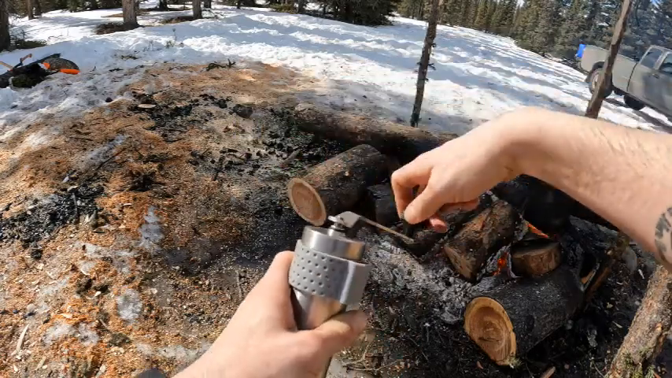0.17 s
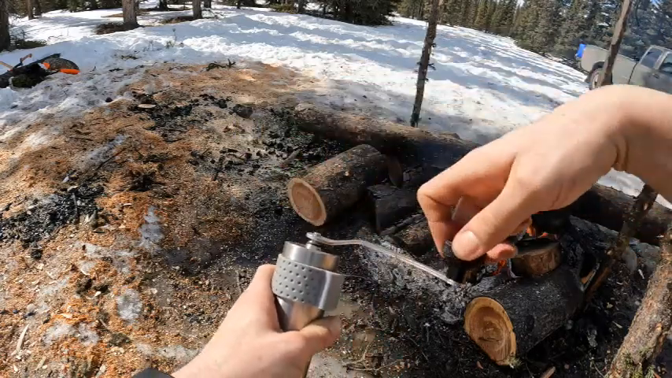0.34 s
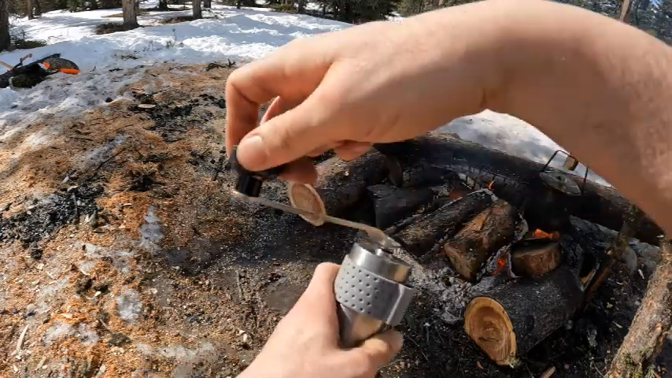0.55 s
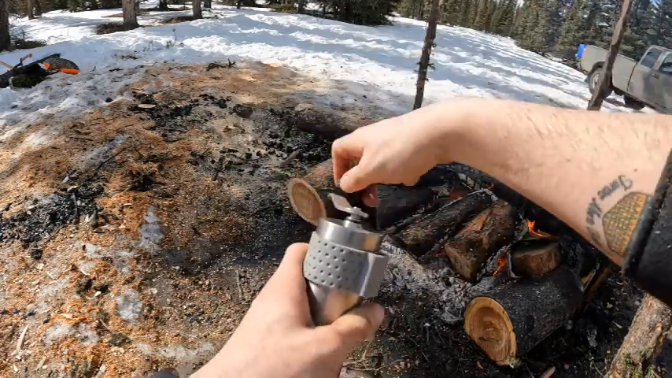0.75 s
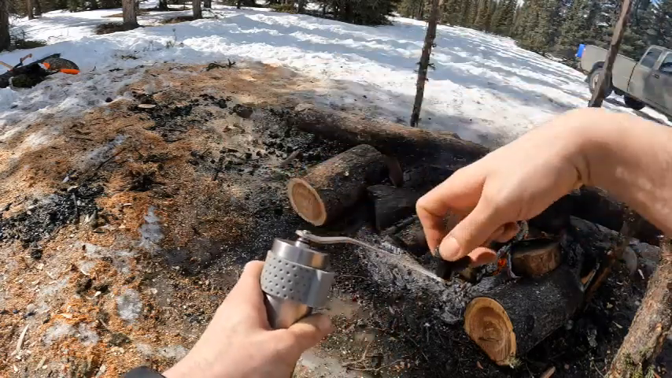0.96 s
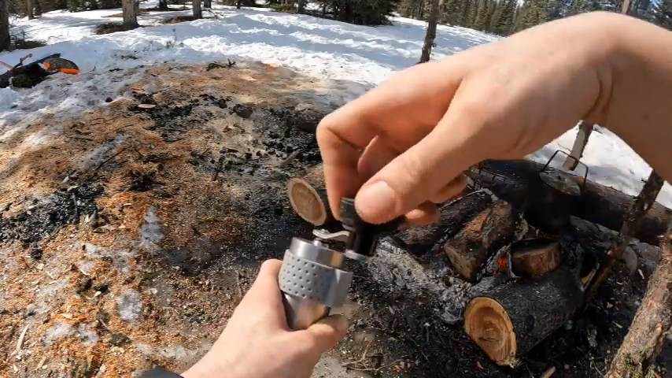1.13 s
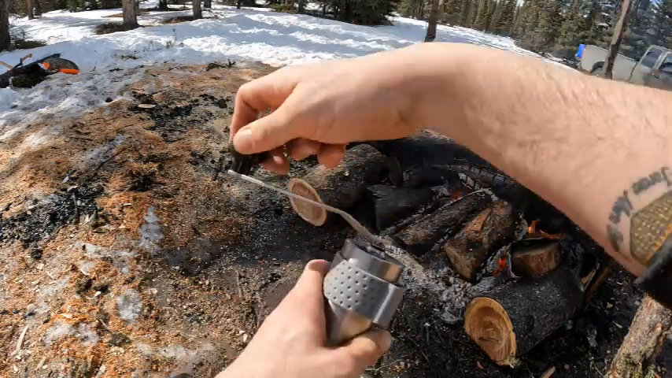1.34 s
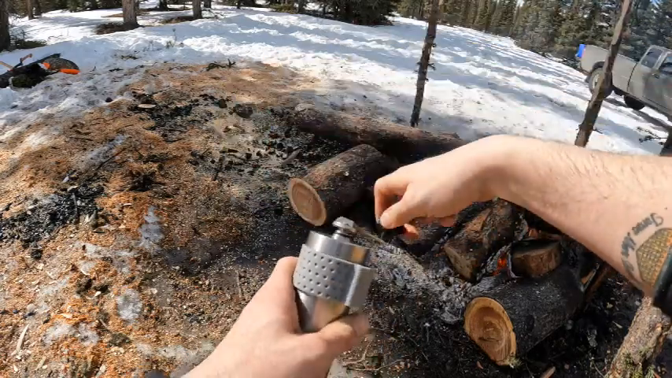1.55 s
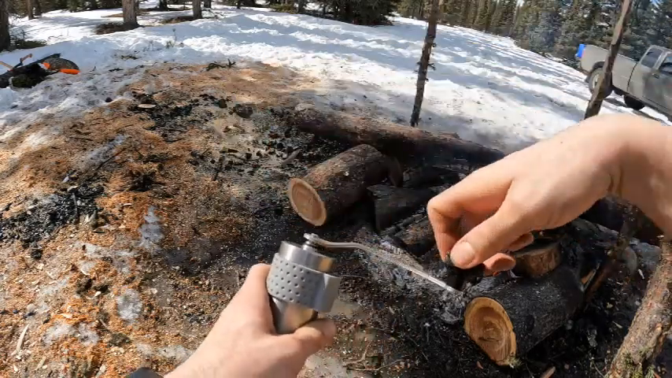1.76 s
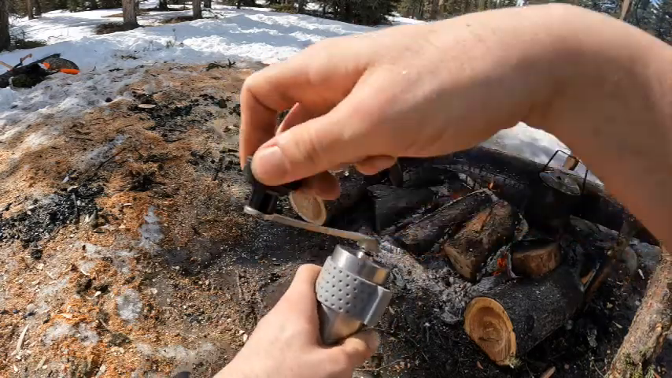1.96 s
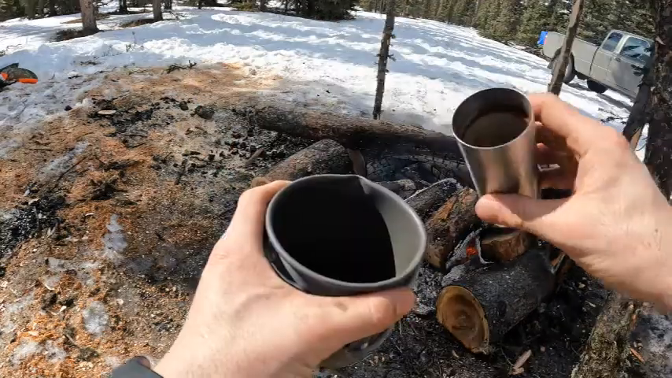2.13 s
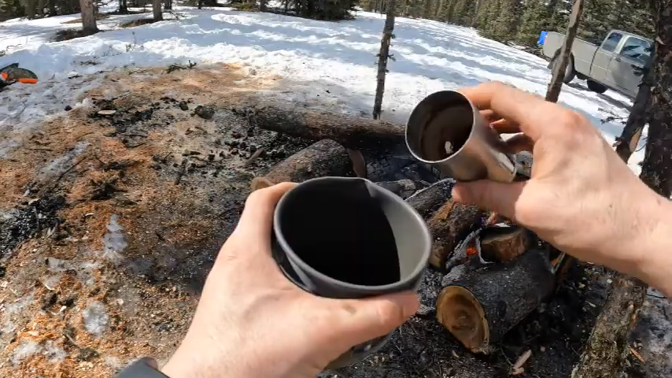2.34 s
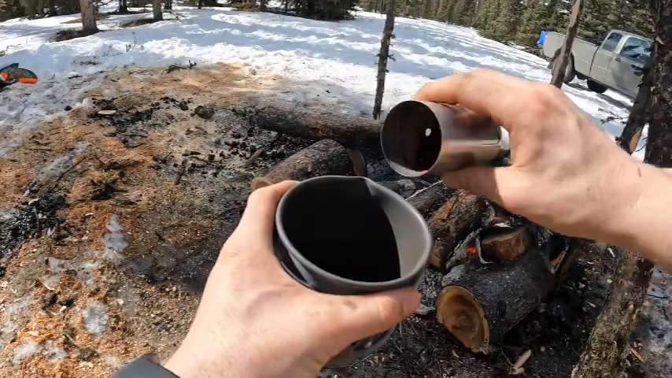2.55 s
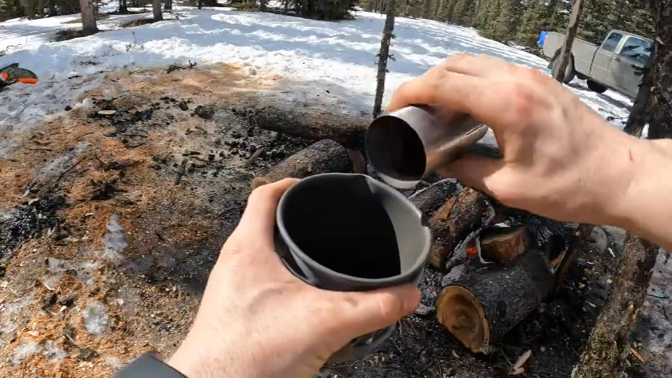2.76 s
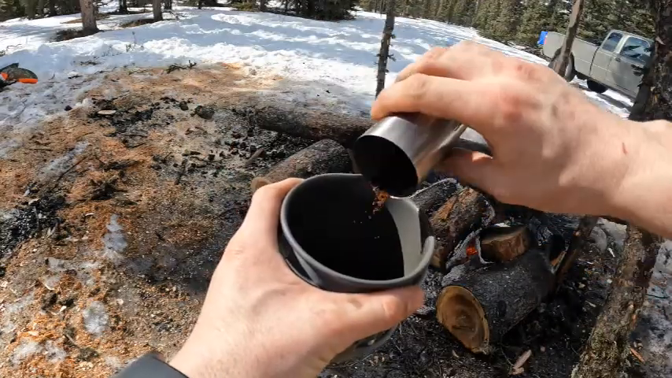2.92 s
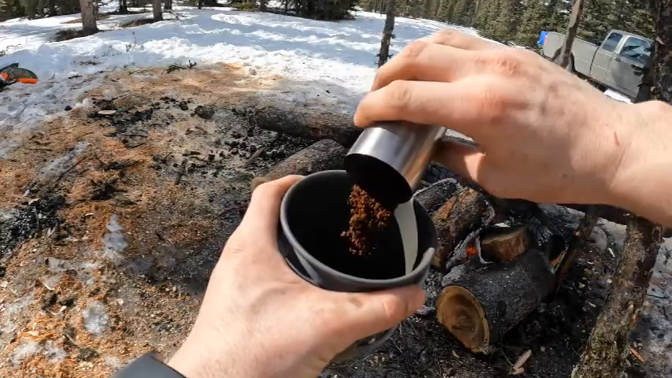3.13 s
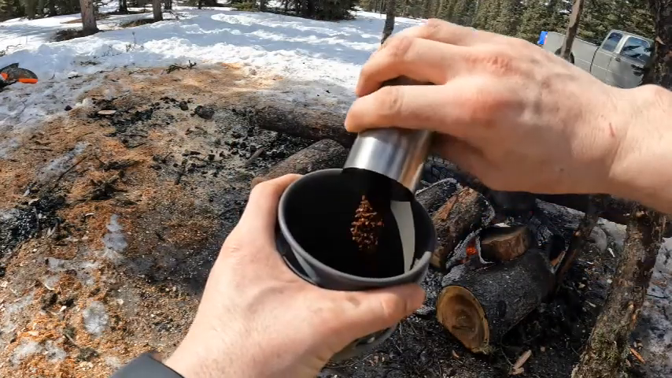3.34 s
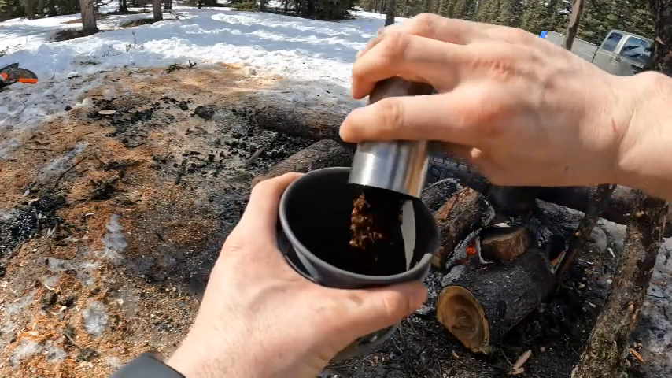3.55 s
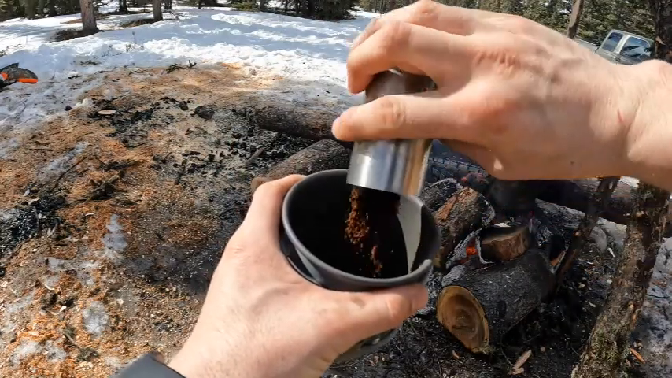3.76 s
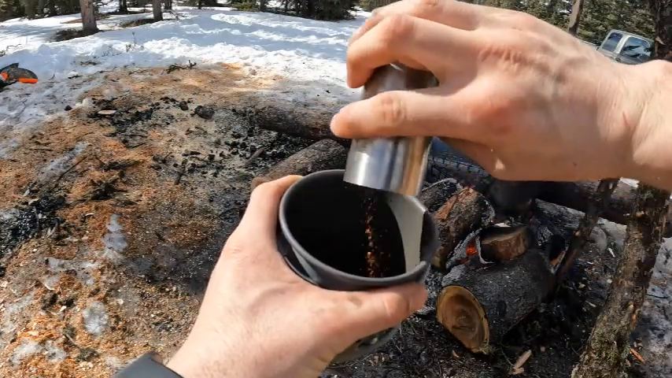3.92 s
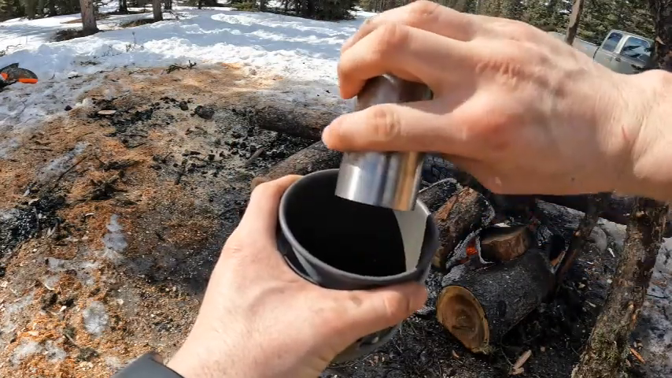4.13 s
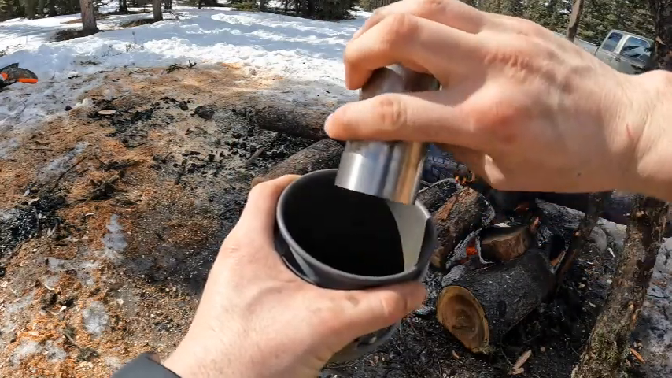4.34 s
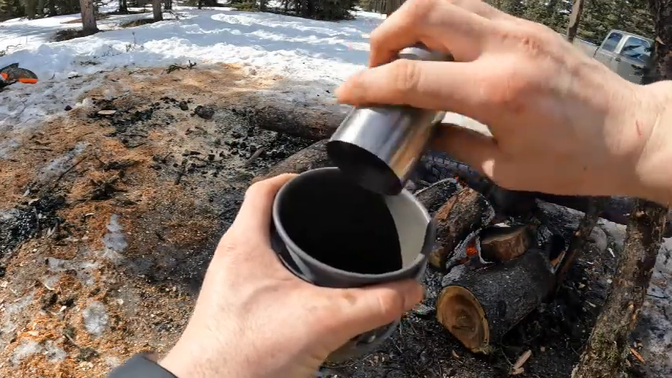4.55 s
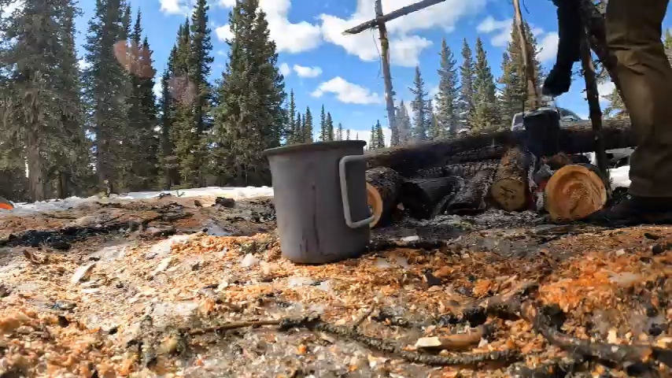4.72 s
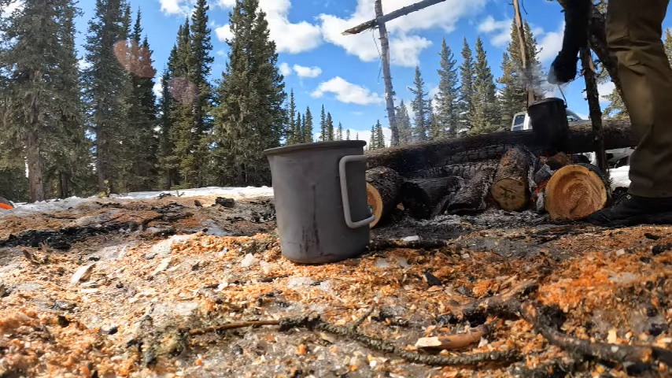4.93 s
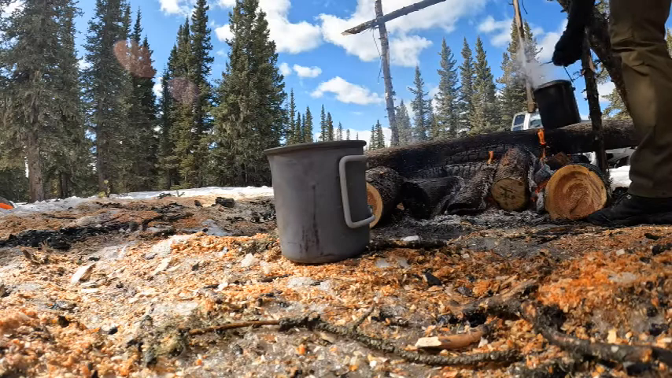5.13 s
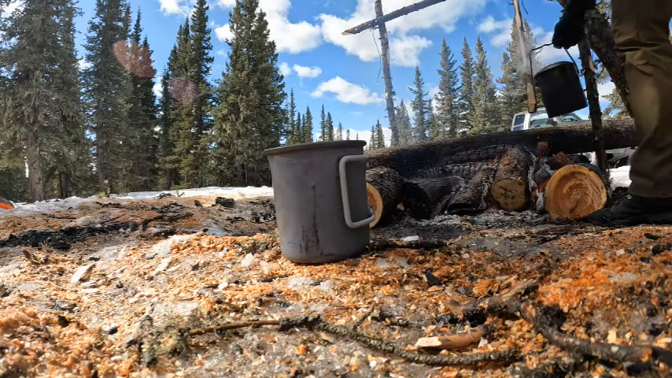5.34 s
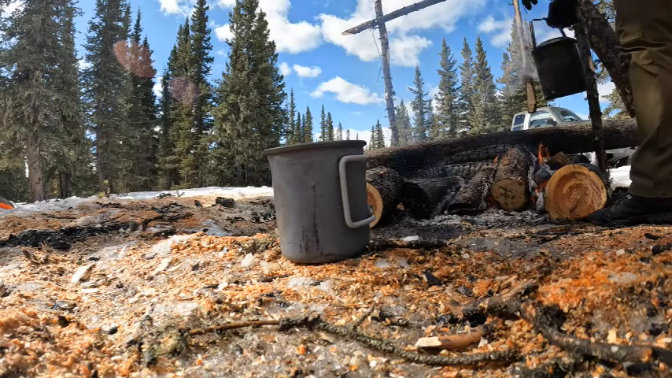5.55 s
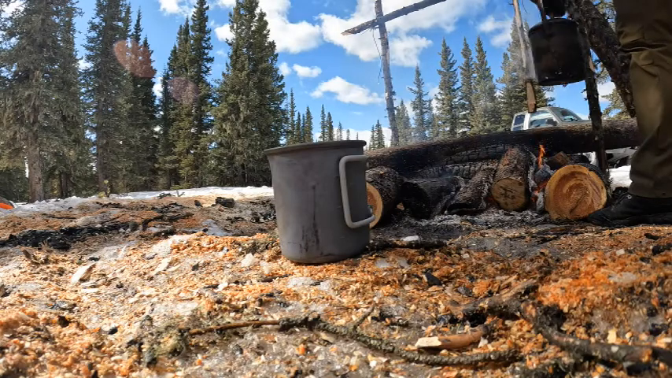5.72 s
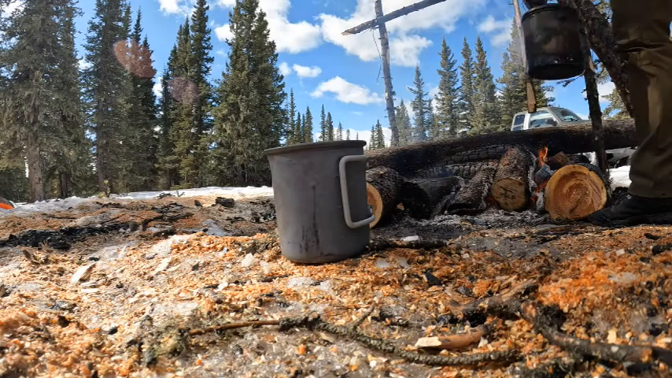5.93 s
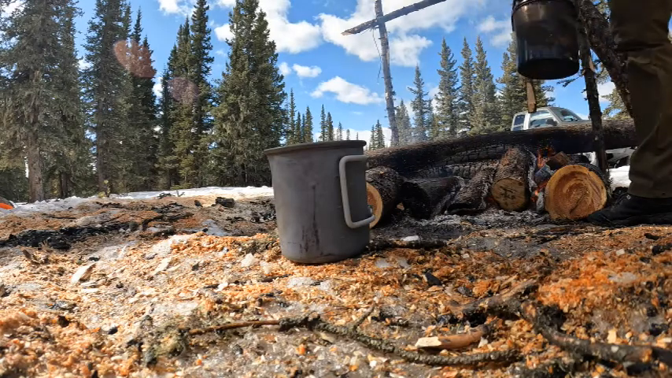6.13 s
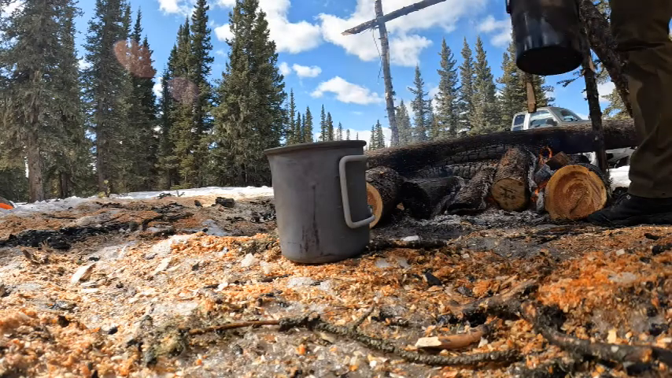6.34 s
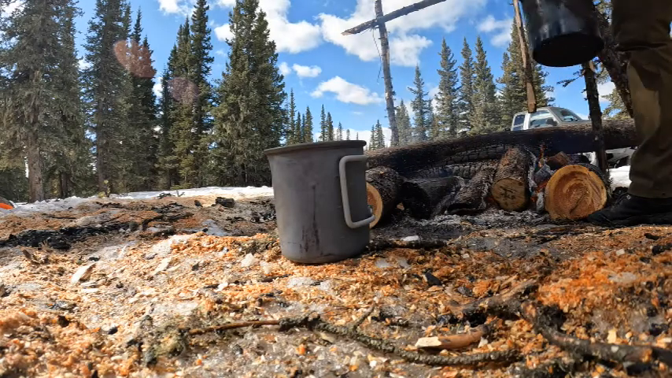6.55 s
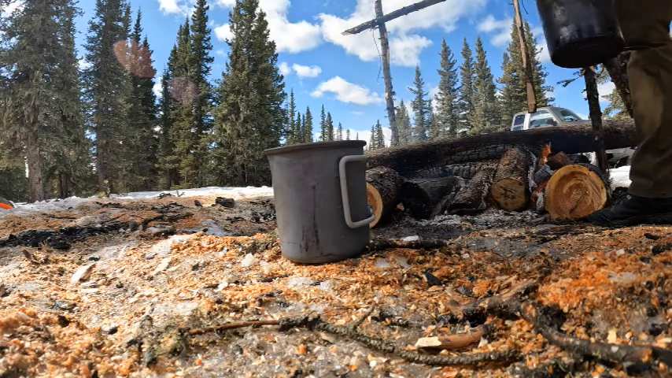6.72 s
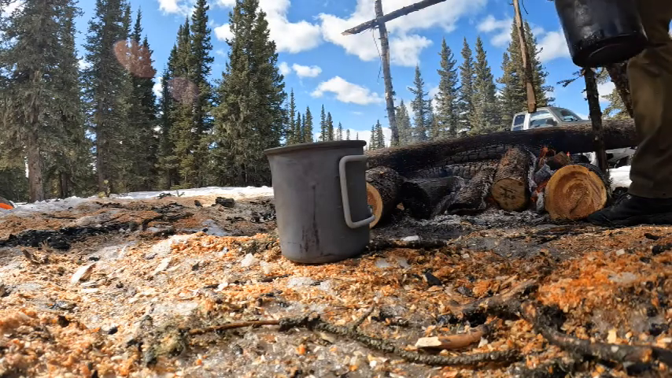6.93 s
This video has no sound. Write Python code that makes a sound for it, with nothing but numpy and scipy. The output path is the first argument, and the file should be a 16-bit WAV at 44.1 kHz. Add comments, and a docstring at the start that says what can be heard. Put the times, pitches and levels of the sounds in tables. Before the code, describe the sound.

Close outdoors, a steel hand grinder cracks coffee beans in uneven clumps with short squeaks and rasps. It stops; light cup taps lead to a hard double-edged knock, then grounds swish out hollowly and patter into a mug while wind nudges the microphone. Finally a soft fire flutters and sizzles, with a thump, gritty rustles, a metallic scrape and a cluster of pot clinks ringing at the end.

```python
"""Coffee at a camp, in three parts

A steel hand grinder cracks beans: pitched bursts over crumb noise, with stick-slip squeaks from the burrs.
The grounds slide from the catch cup into a mug, as grain noise through cup modes, while gusts nudge the microphone.
Then a fire flutters, sizzles and snaps, and a metal pot clinks on its hanger in decaying modes and noisy chatter."""
import sys
import numpy as np
from scipy import signal
from scipy.fft import rfft, irfft, next_fast_len
from scipy.io import wavfile
from scipy.ndimage import map_coordinates

SR = 44100
rng = np.random.default_rng(int(sys.argv[2]) if len(sys.argv) > 2 else 0)


def digitize_waveform(pressure):
    """Quantize a signal to 16-bit integers and store it at the path in sys.argv[1].

    Rows of a 2-D input are taken as channels; values are limited to [-1, 1].
    """
    field = np.atleast_2d(pressure).T
    bounded = np.clip(field, -1, 1)
    quanta = np.round(bounded * 32767).astype(np.int16)
    wavfile.write(sys.argv[1], SR, quanta)


N = 312228

# ends of grinding and of pouring: time_s
PART_ENDS_S = (1.96, 4.545)
# steel burr resonances: centre_hz, width_hz, level_db
BURR_MODES = [(1690, 19, 9), (1980, 70, 8.5), (3545, 170, 3), (4380, 290, 4.5), (4910, 89, 4),
              (5880, 39, 7), (6650, 14, 5), (9670, 100, 0.5)]
# bright edge of a small hard impact: freq_hz, gain_db
SNAP_COLOUR = [(1500, -2.5), (3500, 1), (5200, 12), (7000, 9.5), (9000, -1.5), (12000, -1), (15000, -41)]
# fine hiss, of the fire and of the rustles: freq_hz, gain_db
SIZZLE_COLOUR = [(1760, -62), (3000, -6), (4590, 0.5), (5310, 3), (7960, 0), (8500, -11), (9800, -3),
                 (11900, -11), (15500, -50)]


def amp(db):
    """Decibels to gain."""
    return np.exp(np.asarray(db) * np.log(10) / 20)


def unit(x):
    """Scaled to rms 1."""
    return x / np.sqrt(np.mean(x ** 2) + 1e-20)


def clock(length):
    """Sample times over a length in seconds."""
    return np.arange(int(length * SR)) / SR


def during(start, end):
    """1 between two times, with 10 ms fades."""
    t = np.arange(N) / SR
    return np.clip(np.minimum(t - start, end - t) / .01 + .5, 0, 1)


def envelope(start, hold, rise_db_per_s, fall_db_per_s):
    """Gain that swells to 1 at the start time, holds, then dies away."""
    t = np.arange(N) / SR - start
    rise_db = -abs(rise_db_per_s) * np.maximum(-t, 0)
    fall_db = -abs(fall_db_per_s) * np.maximum(t - hold, 0)
    return amp(rise_db + fall_db)


def wobble(rate, size=N):
    """A smooth random curve, rate knots a second."""
    knots = rng.standard_normal(int(size * rate / SR) + 4)
    return map_coordinates(knots, [np.arange(size) * rate / SR])


def add(track, s, x):
    """Mix x into the track at time s."""
    part = track[max(round(s * SR), 0):][:len(x)]
    part += x[:len(part)]


def colour(x, points):
    """Causal minimum-phase filter through (Hz, dB) points."""
    f, db = np.transpose(points)
    size = 4096
    gain = amp(np.interp(np.log(np.fft.rfftfreq(size, 1 / SR) + 1), np.log(f), db))
    cepstrum = irfft(np.log(np.maximum(gain, 1e-6)))
    # fold the cepstrum onto positive time
    cepstrum[1:size // 2] *= 2
    cepstrum[size // 2 + 1:] = 0
    impulse_response = irfft(np.exp(rfft(cepstrum)))
    return signal.fftconvolve(x, impulse_response)[:len(x)]


def resonate(x, peaks):
    """x through parallel (Hz, width Hz, dB) resonances."""
    size = next_fast_len(len(x) + SR // 4)
    f = np.fft.rfftfreq(size, 1 / SR)
    body = sum(amp(db) * 1j * f * w / (c * c - f * f + 1j * f * w) for c, w, db in peaks)
    return irfft(rfft(x, size) * body, size)[:len(x)]


def noise(size=N):
    """White noise."""
    return rng.standard_normal(size)


def grains(rate, spread_db):
    """Random tiny impacts of unequal size, rms 1."""
    sizes = amp(spread_db * np.clip(noise(), -2, 2)) * np.sign(noise())
    return unit(sizes * (rng.random(N) < rate / SR))


def blow(spectrum, t60, scatter):
    """One impact with a peak near 1: a push, then a dying spray of smaller contacts."""
    t = clock(.1)
    push = colour(t == 0, spectrum)
    spray = colour(noise(len(t)) * amp(-60 * t / t60) * (t > .001), spectrum)
    return (push + scatter * spray) / np.abs(push).max()


def place(x, pan_db, wide_db):
    """Stereo: a level difference, and a shifting reflection that parts the two ports above the bass."""
    echo = colour(np.roll(x, SR // 600), [(300, -8), (2000, 0)])
    side = amp(wide_db) * echo * np.tanh(2 * wobble(15.0))
    return np.array([x * amp(pan_db / 2) + side, x * amp(-pan_db / 2) - side])


def air():
    """Wind nudges the microphone throughout; a faint ringing hiss lies under the first two parts."""
    # breeze in each part: level_db
    breeze_db = (-54, -42, -52)
    # gusts: time_s, above_breeze_db
    gusts = [(2.38, 5), (2.85, 7.5), (3.2, 7), (4.15, 4)]
    # wind colour: freq_hz, gain_db
    buffet_colour = [(12, -35), (20, 1.5), (161, -9.5), (220, -19), (270, -26), (437, -40), (1100, -100)]
    # broad hiss colour: freq_hz, gain_db
    hiss_colour = [(240, -8), (400, -1), (540, 2), (712, 0), (804, -11.5), (1050, -2.5), (1350, -5.5),
                   (2540, -16.5), (4330, -11.5), (6710, -7), (8500, -17), (9960, -15.5), (15000, -61)]
    # narrow hiss bands, low to high: centre_hz, width_hz, level_db
    hiss_bands = [(2810, 100, -6.5), (3150, 59, -5.5), (3840, 90, 5.5), (5560, 26, 4), (5850, 44, 5),
                  (6720, 89, 7.5), (6900, 110, -5), (7520, 74, 3), (9000, 400, -8)]
    gust_width_s = 0.17
    band_shift_db_per_s = 3  # lower bands fade while upper ones grow

    t = np.arange(N) / SR
    gust_db = sum(db * np.exp(-((t - s) / gust_width_s) ** 2) for s, db in gusts)
    wind_db = np.array(breeze_db)[np.searchsorted(PART_ENDS_S, t)] + gust_db
    flutter_db = 2.6 * wobble(14) + 1.2 * wobble(4)
    wind = unit(colour(noise(), buffet_colour) * amp(flutter_db)) * amp(wind_db)

    low_bands = unit(resonate(noise(), hiss_bands[:4]))
    low_bands *= amp(-63.0 - band_shift_db_per_s * (t - 3) + 1.8 * wobble(12))
    high_bands = unit(resonate(noise(), hiss_bands[4:]))
    high_bands *= amp(-58.0 + band_shift_db_per_s * (t - 4.0) + 0.82 * wobble(9.8))
    hiss = amp(-57.5) * unit(colour(noise(), hiss_colour)) + low_bands + high_bands
    hiss *= during(-1, PART_ENDS_S[1])
    return place(wind, pan_db=0, wide_db=-3.5) + place(hiss, pan_db=-1.0, wide_db=-4.5)


def fire():
    """Flames flutter and surge under a fine sizzle; small crackles come in clumps."""
    # flame roar: freq_hz, gain_db
    flame_colour = [(59, -34), (100, -15), (172, 4), (213, -4.5), (290, 1.5), (440, -8), (881, -12.5),
                    (1360, -11.5), (2230, -28), (4000, -46), (8800, -110)]
    # crackles: freq_hz, gain_db
    wood_colour = [(200, -13), (600, 5), (1400, -4), (2500, -12), (4000, -27), (9000, -23)]
    flame_start_db, flame_fall_db_per_s = -45, 2
    sizzle_start_db, sizzle_fall_db_per_s = -57.5, 4  # dies down as the pot leaves the fire
    crackle_above_sizzle_db = 2

    t = np.arange(N) / SR - PART_ENDS_S[1]
    sizzle_db = sizzle_start_db - sizzle_fall_db_per_s * t + 0.24 * wobble(5.7)
    flutter_db = 1.7 * wobble(25) + 2.1 * wobble(7)
    flame_db = flame_start_db - flame_fall_db_per_s * t + flutter_db
    flame = unit(colour(noise(), flame_colour)) * amp(flame_db)
    sizzle_source = noise() + 0.67 * grains(rate=170, spread_db=-5)
    sizzle = unit(colour(sizzle_source, SIZZLE_COLOUR)) * amp(sizzle_db)
    clumps = amp(4.9 * np.tanh(wobble(4.3)))
    snaps = unit(colour(grains(rate=90, spread_db=0.5) * clumps, wood_colour))
    crackle = amp(sizzle_db + crackle_above_sizzle_db) * snaps
    return (flame + sizzle + crackle) * during(PART_ENDS_S[1], 8)


def rustles():
    """Short gritty rustles swell and fade, each with its own share of body and hiss."""
    # rustles beside the fire: start_s, hold_s, body_db, hiss_db
    strokes = [(4.62, 0.14, -47.5, -62.5), (4.925, 0.1, -47, -63), (5.25, 0.023, -48, -58.5),
               (5.918, 0.11, -49.5, -67), (6.494, 0.099, -48, -64)]
    # rustle body: freq_hz, gain_db
    body_colour = [(80, -12), (300, 12), (600, 0), (1600, -4.5), (2600, -14.5), (6000, -33)]
    rise_db_per_s, fall_db_per_s = 500, 211

    body, hiss = np.zeros(N), np.zeros(N)
    for s, hold, body_db, hiss_db in strokes:
        swell = envelope(s, hold, rise_db_per_s, fall_db_per_s)
        body += amp(body_db) * swell
        hiss += amp(hiss_db) * swell
    grit = grains(rate=1500, spread_db=5)
    return body * unit(colour(grit, body_colour)) + hiss * unit(colour(grit + noise(), SIZZLE_COLOUR))


def scrape():
    """A hissing rub: dense grains stir a faint metallic ring."""
    # scrapes: start_s, hold_s, level_db
    strokes = [(5.768, 0.12, -40), (6.017, 0.013, -55)]
    # metallic ring: centre_hz, width_hz, level_db
    ring_modes = [(261, 25, 8), (1330, 110, -14), (1690, 83, -12.5), (4140, 200, -24), (4800, 70, -12),
                  (5330, 40, -4.5), (6100, 210, -16), (7040, 90, -13.5)]
    # rub hiss: freq_hz, gain_db
    hiss_colour = [(200, -15), (300, -4), (500, -22), (1800, -16), (2800, -4), (5500, 1), (8500, -17),
                   (12000, -5), (15000, -47)]
    rise_db_per_s, fall_db_per_s = 350, 229

    level = sum(amp(db) * envelope(s, hold, rise_db_per_s, fall_db_per_s) for s, hold, db in strokes)
    rub = grains(rate=4400, spread_db=0)
    sound = unit(resonate(rub, ring_modes)) + 0.22 * unit(colour(rub, hiss_colour))
    return level * unit(sound)


def pot():
    """Each contact chatters unevenly; the hanger rings briefly, the pot sings on in wavering tones."""
    # pot against hanger: start_s, pot_ring_db, hanger_ring_db, clash_db, chatter_t60_s
    clinks = [(6.73, -47, -53, -45, 0.17), (6.761, -52, -37, -28, 0.28), (6.81, -54, -40, -18.5, 0.13),
              (6.8523, -44.5, -47, -13.5, 0.055), (6.863, -56, -43, -21, 0.1)]
    # pot modes: freq_hz, level_db
    pot_modes = [(1577, -5), (1701, -0.5), (1992, -11), (2700, -17), (3176, -11), (3690, -3), (4011, -10),
                 (4440, -15), (4856, -1.5), (5658, -15), (6799, -19), (7660, -12), (8861, -22), (9631, -25)]
    # hanger modes: freq_hz, level_db
    hanger_modes = [(1605, -4), (1996, -1), (2200, -6), (3735, 1.5), (4650, -4), (4870, -13), (5050, -6),
                    (5150, -2), (9900, -14), (10330, -11)]
    # clash colour: freq_hz, gain_db
    clash_colour = [(290, -10.5), (500, -8.5), (745, -13), (1170, -20), (2020, -16.5), (2960, -21.5),
                    (3450, -13), (6030, -10.5), (6960, -16), (9790, -18), (15000, -53)]
    # pot resonances stirred by the chatter: centre_hz, width_hz, level_db
    body_modes = [(983, 80, 3.5), (3700, 56, -6), (4560, 90, 4.5), (5400, 140, 2.5), (6080, 110, 4),
                  (8670, 69, 1)]
    pot_t60_s, hanger_t60_s = 1.2, 0.24
    wall_t60_s = 0.41  # at 4000 Hz

    out, t = np.zeros(N), clock(0.36)

    def waver(db, rate):
        return amp(db * np.tanh(wobble(rate, len(t))))

    def ring(modes, t60):
        tones = sum(amp(db) * waver(4, 55) * np.sin(2 * np.pi * (hz * t + rng.random())) for hz, db in modes)
        return amp(-60 * t / t60) * tones

    # crowd of weak modes of the thin wall; higher ones die sooner
    wall_hz = rng.uniform(900, 12000, (380, 1))
    wall_fade = amp(-60 * t / (wall_t60_s * (4000 / wall_hz) ** 0.39))
    wall_tones = np.sin(2 * np.pi * (wall_hz * t + rng.random(wall_hz.shape)))
    wall = (wall_fade * wall_tones).sum(axis=0)
    shimmer = amp(-28.0) * unit(colour(wall, clash_colour))
    for s, pot_db, hanger_db, clash_db, chatter_t60 in clinks:
        tones = amp(pot_db) * ring(pot_modes, pot_t60_s) + amp(hanger_db) * ring(hanger_modes, hanger_t60_s)
        contacts = noise(len(t)) * amp(-60 * t / chatter_t60) * waver(4, 300)
        chatter = amp(-22.5) * unit(colour(contacts, clash_colour))
        chatter += amp(-23) * unit(resonate(contacts, body_modes))
        onset = 1 - np.exp(-t / 0.0012)
        add(out, s, (tones + amp(clash_db) * (chatter + shimmer)) * onset)
    return out


def bumps():
    """Soft, heavy contacts: a low push that rings for a cycle or two."""
    # dull bumps of hands and loads: time_s, peak_db, pitch_hz
    contacts = [(0.266, -19.5, 725), (0.829, -30, 189), (2.907, -15.5, 156), (4.874, -11.5, 340),
                (4.936, -28.5, 288), (6.733, -21, 330), (6.878, -12, 413), (6.881, -18.5, 167)]
    out = np.zeros(N)
    for s, db, hz in contacts:
        body = [(hz / 10, -22), (hz / 1.43, -3), (hz, 0), (hz * 1.31, -5), (hz * 3, -22), (hz * 9, -50)]
        add(out, s, amp(db) * blow(body, t60=0.041, scatter=0.058))
    return out


def knocks():
    """Short dry impacts: a woody middle under a bright snap."""
    # knocks of the cups, snaps of firewood, and the body of the pot's first clink (last row): time_s,
    # body_peak_db, pitch_hz, edge_peak_db
    impacts = [(2.1366, -44.5, 1030, -28), (2.5151, -28.5, 2230, -21.5), (2.9054, -11, 1100, -14.5),
               (2.907, -11.5, 2430, -15.5), (2.9489, -28.5, 1330, -17), (3.0717, -33.5, 1620, -21.5),
               (3.615, -54, 1500, -32), (3.8634, -57, 1030, -36), (4.6534, -24, 1370, -38),
               (4.7347, -28.5, 1140, -40), (4.8733, -20, 1040, -12), (4.934, -33, 2700, -34),
               (5.0123, -28, 1490, -48), (5.035, -35, 1300, -44), (5.0602, -35, 2060, -29.5),
               (5.2105, -36.5, 2500, -26), (5.219, -30, 1100, -46), (5.2467, -29, 790, -44),
               (5.3978, -30.5, 1310, -22), (5.9298, -31, 1600, -27.5), (6.022, -30.5, 910, -38),
               (6.501, -31.5, 774, -54), (6.732, -27, 1430, -51)]
    out = np.zeros(N)
    for s, db, hz, edge_db in impacts:
        body = [(hz / 7, -22), (hz / 1.6, -8), (hz, 0), (hz * 1.35, -4), (hz * 2.3, -22), (12000, -42)]
        add(out, s, amp(db) * blow(body, t60=0.038, scatter=0.061))
        add(out, s + 0.0006, amp(edge_db) * blow(SNAP_COLOUR, t60=0.022, scatter=0.086))
    return out


def air_column(rubbing):
    """The cup's modes flutter as the heap shifts, and swell one after another from the top down."""
    # catch cup air column: centre_hz, width_hz, level_db
    cup_modes = [(747, 25, 7.5), (1535, 23, 6), (2147, 40, -2.5), (2680, 110, -4), (3017, 27, -0.5),
                 (3940, 90, -8.5), (4580, 55, 0), (6380, 48, 1.5), (7180, 47, -1), (9000, 93, -9)]
    middle_hz, lag_s_per_octave = 2900, 0.016
    flutter_db = 2.5

    rub = grains(rate=4600, spread_db=12.5)
    modes = np.array([resonate(rub, [mode]) for mode in cup_modes])
    modes /= modes.sum(axis=0).std()
    lags = [round(SR * lag_s_per_octave * np.log2(middle_hz / hz)) for hz, width, db in cup_modes]
    swelling = sum(mode * np.roll(rubbing, lag) for mode, lag in zip(modes, lags))
    return swelling * amp(flutter_db * np.tanh(wobble(60)))


def pour():
    """Grounds rub the catch cup, sounding its air column, and patter into the mug; coarse bits tick."""
    # grounds slipping out of the cup: start_s, hold_s, level_db, column_above_level_db
    slides = [(3.139, 0.053, -52, 12.5), (3.286, 0.017, -63, -3), (3.607, 0.011, -57.5, -6),
              (3.835, 0.011, -53.5, -20)]
    # heaps landing in the mug: time_s, level_db, fall_db_per_s
    heaps = [(3.24, -42.5, 300), (3.36, -50.5, 55), (3.61, -56, 44)]
    # coarse bits striking the steel: time_s, peak_db
    coarse_bits = [(3.042, -33), (3.08, -30), (3.255, -31), (3.451, -36), (3.488, -32), (3.833, -38),
                   (4.143, -39)]
    slide_rise_db_per_s, slide_fall_db_per_s = 398, 145
    heap_rise_db_per_s = 230
    dribble_s, dribble_hold_s, dribble_db = 3.1, 1, -68.5  # loose grounds keep running over the rim

    flow = amp(dribble_db) * envelope(dribble_s, dribble_hold_s, slide_rise_db_per_s, slide_fall_db_per_s)
    rubbing, ticks = np.zeros(N), np.zeros(N)
    for s, hold, db, column_db in slides:
        slide = amp(db) * envelope(s, hold, slide_rise_db_per_s, slide_fall_db_per_s)
        flow += slide
        rubbing += amp(column_db) * slide
    for s, db in coarse_bits:
        add(ticks, s, amp(db) * blow(SNAP_COLOUR, t60=0.018, scatter=0.12))
    landing = sum(amp(db) * envelope(s, 0, heap_rise_db_per_s, fall) for s, db, fall in heaps)
    trickle_colour = [(2500, -7.5), (7000, 5.5), (12000, 2.0), (15000, -36)]
    trickle = amp(2.5) * unit(colour(grains(rate=900, spread_db=5.0), trickle_colour))
    mug_colour = [(300, -58), (530, 4), (770, -1.5), (980, -25), (3000, -36.0)]
    mug = unit(colour(grains(rate=570, spread_db=3.0), mug_colour))
    return (air_column(rubbing) + flow * trickle + landing * mug + ticks) * during(*PART_ENDS_S)


def squeaks():
    """The burrs stick and slip at a gliding, unsteady rate; each slip rasps and rings the steel."""
    # burr rubbing on burr: start_s, length_s, first_slip_hz, last_slip_hz, tone_db, rasp_db
    rubs = [(0.026, 0.029, 1330, 1450, -33.5, -38), (0.034, 0.025, 7100, 6576, -46, -27.5),
            (0.054, 0.046, 1480, 1690, -28, -38), (0.074, 0.028, 3150, 3540, -32.5, -51),
            (0.339, 0.024, 983, 1165, -35, -31), (0.405, 0.042, 892.5, 858, -26.5, -25),
            (0.406, 0.029, 10500, 10500, -32.5, -48), (0.461, 0.041, 876, 773, -31.5, -37),
            (0.494, 0.045, 2450, 2435, -34.5, -31.5), (0.513, 0.043, 1432, 728, -28.5, -27.5),
            (0.623, 0.029, 919, 720, -29.5, -31), (0.626, 0.031, 7040, 6130, -35, -37),
            (0.678, 0.022, 1445, 1620, -30.5, -39), (0.714, 0.032, 1575, 1450, -34, -31),
            (0.734, 0.043, 938, 1334, -31.5, -29.5), (0.776, 0.03, 6760, 6550, -50, -29.5),
            (0.884, 0.023, 12000, 9800, -49, -41), (0.916, 0.045, 10200, 8560, -43, -45),
            (0.957, 0.015, 7600, 6300, -41, -36), (0.976, 0.01, 5330, 5140, -28.5, -34),
            (0.993, 0.067, 891, 885, -30, -33), (1.063, 0.047, 988, 1086, -33.5, -27.5),
            (1.107, 0.017, 4880, 4800, -39, -40), (1.182, 0.033, 1427, 1630, -31.5, -31.5),
            (1.211, 0.027, 1720, 1447, -26.5, -28), (1.233, 0.035, 1167, 1330, -30.5, -26.5),
            (1.243, 0.041, 6650, 6580, -32.5, -51), (1.476, 0.029, 9560, 9280, -35, -32.5),
            (1.515, 0.016, 1866, 2060, -57, -24), (1.542, 0.034, 6750, 6700, -39, -48),
            (1.555, 0.025, 1410, 1430, -27, -33.5), (1.804, 0.024, 4150, 5170, -52, -34),
            (1.891, 0.015, 5070, 4510, -56, -26)]
    # rasp colour: freq_hz, gain_db
    rasp_colour = [(300, -35), (900, 15.5), (2000, 0), (3000, -8), (5000, 6), (7000, 8.5), (8600, -8),
                   (10200, -4.5), (12500, -13), (15500, -36.5)]
    attack_s, release_s = 0.0025, 0.0095
    jitter_share, drift_share = 0.027, 0.011  # fast and slow unsteadiness of the slip rate
    scatter_cycles = 0.05  # single slips come early or late
    force_noise = 0.35  # hiss beside the slips' rms of 1
    overtone_top_hz = 10000

    tone, rasp = np.zeros(N), np.zeros(N)
    for s, length, first_hz, last_hz, tone_db, rasp_db in rubs:
        t = clock(length + .04)
        size = len(t)
        glide_hz = np.interp(t, [0, length], [first_hz, last_hz])
        hz = glide_hz * (1 + jitter_share * wobble(900, size) + drift_share * wobble(140, size))
        phase = 2 * np.pi * np.cumsum(hz) / SR
        swell = 1 - np.exp(-t / attack_s)
        swell *= np.exp(-np.maximum(t - length + release_s, 0) / release_s)

        # each overtone comes and goes on its own
        partials = np.zeros(size)
        for k in range(1, 4):
            partial_db = -10.5 * np.log2(k) + 5 * np.tanh(wobble(170, size))
            partials += amp(partial_db) * np.sin(k * phase) * (k * hz < overtone_top_hz)
        add(tone, s, amp(tone_db) * swell * unit(partials))

        slip_count = np.floor(phase / (2 * np.pi) + scatter_cycles * wobble(first_hz, size))
        slips = np.diff(slip_count, prepend=0) * amp(5 * np.tanh(noise(size)))
        force = unit(slips - slips.mean()) + force_noise * noise(size)
        # the point of contact moves, so each squeak favours other modes
        steel = resonate(force, [(c, w, db + rng.normal(0, 3)) for c, w, db in BURR_MODES])
        grip = unit(amp(3.2 * np.tanh(wobble(260, size))))
        scraping = unit(unit(colour(force, rasp_colour)) + 0.9 * unit(steel))
        add(rasp, s, amp(rasp_db) * swell * grip * scraping)
    return tone + rasp


def fractures(s, db, hz):
    """Brittle cracks: each rings for a cycle or two at its own pitch, under a bright edge."""
    # what the casing lets through: freq_hz, gain_db
    casing_colour = [(100, -10.5), (400, -9), (800, -6), (7000, 1.5), (8500, -7), (15000, -25)]
    rise_cycles = 0.42
    edge_db = -5.5  # re the body of the crack

    t = clock(.008)
    edge_hz = rng.uniform(3100, 7400, len(s))
    cycles = np.array([hz, edge_hz])[:, :, None] * t
    swell = cycles / rise_cycles * np.exp(1 - cycles / rise_cycles)
    body, edge = np.sin(2 * np.pi * cycles) * swell
    waves = (amp(db) * np.sign(noise(len(s))))[:, None] * (body + amp(edge_db) * edge)
    at = np.round(s * SR).astype(int)[:, None] + np.arange(len(t))
    cracks = np.bincount(at.ravel(), waves.ravel(), N)[:N]
    return colour(cracks, casing_colour)


def crunch():
    """Chips crack in clumps over a bed of fine crumbs; now and then a whole bean splits and crumbles."""
    # beans that split, levels ahead of the casing: time_s, level_db, pitch_hz
    beans = [(0.1318, -9, 1540), (0.149, -15.5, 1200), (0.169, -16, 1750), (0.2197, -11.5, 1610),
             (0.24, -22, 1110), (0.266, -20, 1280), (0.2994, -16, 2100), (0.3387, -15, 1430),
             (0.4108, -14.5, 1720), (0.4953, -12, 2320), (0.5857, -11, 1690), (0.59, -13.5, 900),
             (0.706, -14, 1450), (1.1097, -9.5, 1690), (1.1156, -10, 1420), (1.1466, -19, 1940),
             (1.2862, -21.5, 1170), (1.338, -17, 1390), (1.3808, -19.5, 1980), (1.4583, -13.5, 1050),
             (1.4643, -14.5, 1460), (1.5027, -8, 1430), (1.615, -21, 1960), (1.6413, -22, 890),
             (1.669, -22, 2000), (1.7253, -22, 1200), (1.7446, -16.5, 1390), (1.8097, -10, 1980),
             (1.8445, -12, 950), (1.846, -16, 1510), (1.879, -18, 1290), (1.9163, -13.5, 2110)]
    # load of beans on the burrs: time_s, relative_level_db
    load = [(0, -35), (0.14, -32), (0.205, -36), (0.25, -35), (0.31, -37.5), (0.5, -32), (0.575, -38),
            (0.7, -30.5), (0.85, -33), (0.9, -41.5), (1.0, -36.5), (1.17, -33.5), (1.41, -37.5),
            (1.6, -33.5), (1.7, -36.5), (1.93, -35.5)]
    # crumb colour: freq_hz, gain_db
    hopper_colour = [(70, -32), (200, -5), (370, -16), (541, -4), (727, 0.5), (861, -7.5), (1040, 0),
                     (1960, -2), (2810, -5), (6660, -16.5), (8580, -29), (9950, -25), (15500, -48)]
    crank_stop_s, crank_stop_db_per_s = 1.933, 144
    chips_per_s, chip_hz, chip_spread_octaves, chip_spread_db = 330, 1450, 0.44, 2
    clump_db, clumps_per_s = 3, 110
    crumble_db = -3.5  # trail of crumbs, re its bean

    grind_s = PART_ENDS_S[0]
    load_db = np.interp(np.arange(N) / SR, *np.transpose(load))
    when, chance, pitch = rng.random((int(chips_per_s * grind_s), 3)).T
    sizes_db = chip_spread_db * np.minimum(-np.log(1 - chance), 2.5)
    pitches_hz = chip_hz * 2 ** (chip_spread_octaves * (4 * pitch - 2))
    chips = fractures(when * grind_s, sizes_db, pitches_hz)
    chips = unit(chips) + 0.34 * unit(resonate(chips, BURR_MODES))  # every crack rings the burrs a little
    chips /= chips[:int(grind_s * SR)].std()
    crumbs = unit(colour(grains(rate=2500, spread_db=0), hopper_colour))
    clumps = unit(amp(clump_db * np.tanh(2 * wobble(clumps_per_s))))
    cranking = envelope(0, crank_stop_s, 0, crank_stop_db_per_s) * during(-1, grind_s)
    out = (chips + .8 * crumbs) * clumps * amp(load_db - 2.5) * cranking
    t = clock(.05)
    for s, db, hz in beans:
        trail = noise(len(t)) * amp(-60 * t / 0.026)
        add(out, s, amp(db + crumble_db) * colour(trail, hopper_colour))
    return out + fractures(*np.transpose(beans))


def scene():
    """Air, camp, cups and grinder, each with its own pan and width."""
    camp = place(fire() + rustles(), pan_db=-1, wide_db=-10)
    camp += place(pot() + scrape(), pan_db=-3.5, wide_db=-14)
    cups = place(knocks() + bumps(), pan_db=-1.5, wide_db=-13) + place(pour(), pan_db=-1.5, wide_db=-13)
    grinder = place(crunch() + squeaks(), pan_db=0.0, wide_db=-11.0)
    return air() + camp + cups + grinder


def record(dry):
    """Sound reaches the right port slightly first; the ports differ in colour and share a band limit."""
    # mismatch of the microphone ports: freq_hz, left_minus_right_db
    port_mismatch = [(1000, -0.5), (4000, -3), (9000, 1.5), (13000, 1.5)]
    top_hz = 14900
    lag_samples = .4  # left behind right

    size = next_fast_len(N + SR // 4)
    f = np.fft.rfftfreq(size, 1 / SR)
    sides = np.array([[1], [-1]])
    lag = np.exp(-1j * np.pi * f / SR * lag_samples * sides)
    balance = amp(sides * np.interp(f, *np.transpose(port_mismatch)) / 2)
    return irfft(rfft(dry, size) * lag * balance * (f < top_hz), size)[:, :N]


dry = scene()
out = record(dry)
digitize_waveform(out)
```